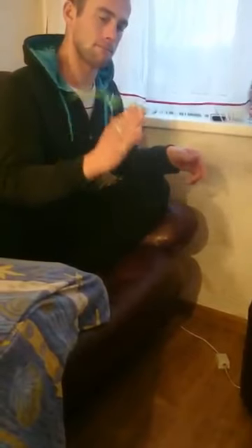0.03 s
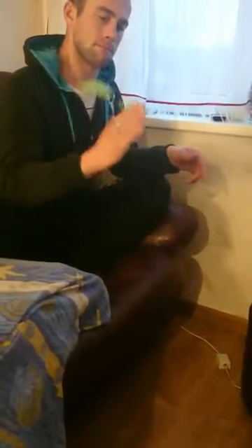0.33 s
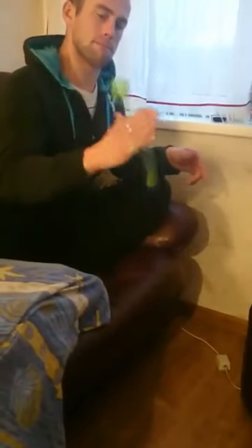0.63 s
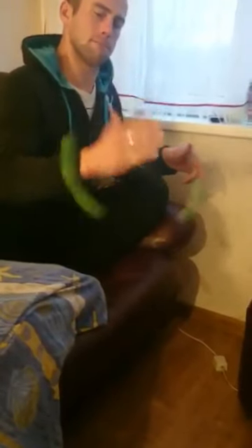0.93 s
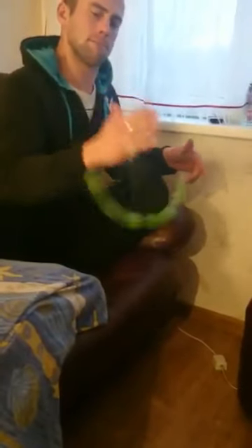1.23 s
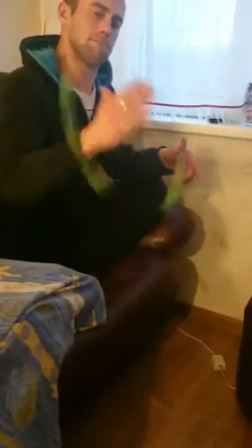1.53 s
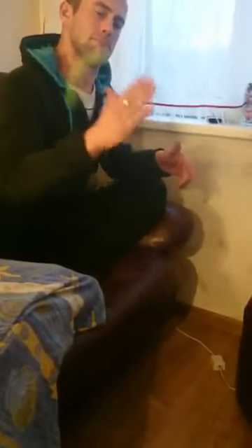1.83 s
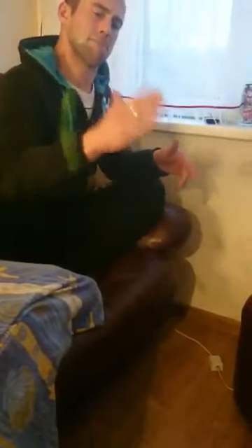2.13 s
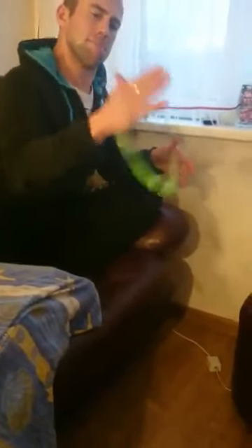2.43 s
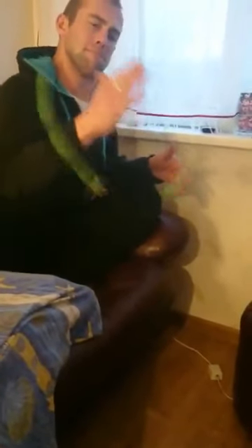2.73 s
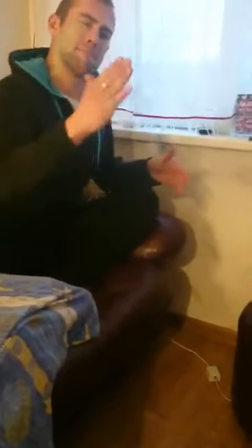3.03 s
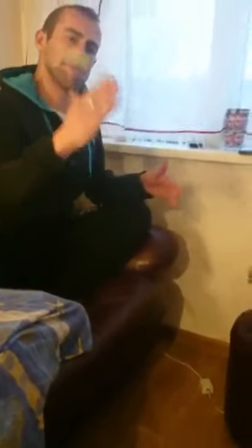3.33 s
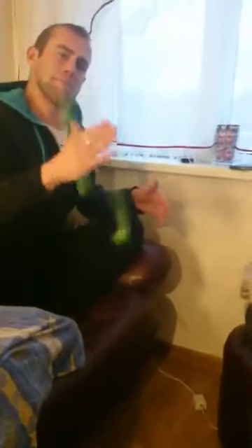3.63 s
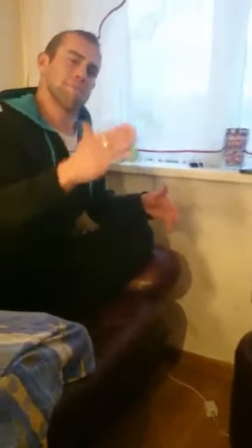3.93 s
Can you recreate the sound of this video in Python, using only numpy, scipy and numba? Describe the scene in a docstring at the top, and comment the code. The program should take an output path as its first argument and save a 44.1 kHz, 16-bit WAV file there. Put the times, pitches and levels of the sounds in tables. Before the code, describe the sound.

Clacker balls on a string strike each other from the start to the end at about 4 seconds, roughly fourteen times a second without a break. Each clack is a sharp tick with a short, bright small-room echo, at a nearly constant loud level. The hits overload the phone microphone, some adding a dull knock and rasp on the left. A faint low room rumble lies underneath.

```python
"""Clackers in a small room, on a phone's two microphones

Two hard balls on a string strike each other above and below the hand, about 14 times a second.
Each clack is a sharp tick followed by a bright wash of reflections, over a faint room rumble.
The clacks overload both microphones, the slightly nearer left one lopsidedly (a dull knock
and a rasp), and a fast limiter holds the level nearly flat."""
import sys
import numpy as np
from scipy import signal
from scipy.fft import rfft, irfft
from scipy.io import wavfile
from scipy.ndimage import uniform_filter1d, minimum_filter1d
from numba import njit

SR = 44100
rng = np.random.default_rng(int(sys.argv[2]) if len(sys.argv) > 2 else 0)


def store_pcm(level_fs):
    """Save levels as 16-bit WAV."""
    pcm = np.round(np.clip(level_fs, -1, 1) * 32767).astype(np.int16)
    wavfile.write(sys.argv[1], SR, np.atleast_2d(pcm).T)


N = 4 * SR
TOP_HZ = 15400  # upper edge of the phone's treble


def undb(db):
    """Decibels to gain."""
    return 10 ** (np.asarray(db) / 20)


def along(points, hz):
    """Reads (Hz, value) points on a log-frequency axis."""
    knots_hz, values = np.array(points).T
    return np.interp(np.log(hz + 1), np.log(knots_hz), values)


def unit(x):
    """Scales each channel to energy 1."""
    return x / np.sqrt(np.sum(x ** 2, axis=-1, keepdims=True))


def butter(x, hz, kind, order=2):
    """Plain low- or high-pass."""
    return signal.sosfilt(signal.butter(order, hz, kind, fs=SR, output="sos"), x)


def pulse(db_of_hz, size=512):
    """The shortest causal pulse with a given spectrum (minimum phase)."""
    hz = np.arange(size // 2 + 1) * SR / size
    cepstrum = irfft(np.log(undb(db_of_hz(hz))))
    cepstrum[1:size // 2] *= 2
    cepstrum[size // 2 + 1:] = 0
    return irfft(np.exp(rfft(cepstrum)))


# Spectrum of the balls' contact: frequency_hz, level_db
TICK_SPECTRUM = [(60, -34), (300, -11.5), (800, 4), (2000, 6), (4200, 3.5), (7000, -6), (12500, -0.5),
                 (15500, 4)]
# Paths to the phone (direct, off a near surface, off the farther wall): delay_s, level_db
TICK_PATHS = [(0, -18), (.004, -17), (0.0127, -19)]


def contact_tick(t, smear_s=0.00032):
    """The hard balls meet in a sharp tick, which arrives by three slightly smeared paths."""
    paths = np.zeros((2, len(t)))
    for delay_s, level_db in TICK_PATHS:
        age = t - delay_s * (1 + 0.1 * rng.standard_normal((2, 1)))  # the balls move between clacks
        arrival = rng.standard_normal(paths.shape) * (age >= 0) * np.exp(-np.abs(age) / smear_s)
        paths += undb(level_db) * unit(arrival)
    tick = unit(pulse(lambda hz: along(TICK_SPECTRUM, hz)))
    return signal.fftconvolve(paths, tick[None], axes=1)


# Time the small room takes to die away by 60 dB: frequency_hz, decay_s
ROOM_DECAY = [(200, 0.51), (1000, .3), (2500, 0.37), (4500, 0.38), (8000, 0.24), (13000, 0.16)]


def room_response(t, wash_rise_s=0.0014, early_per_s=500, early_fade_s=0.01, early_db=-6):
    """The room scatters sound to both microphones: sparse first reflections, then a dense wash."""
    shape = (2, len(t))
    hz = np.arange(len(t) // 2 + 1) * SR / len(t)
    centres_hz, decay_s = np.array(ROOM_DECAY).T
    band_shares = np.array([along(np.c_[centres_hz, row], hz) for row in np.eye(len(centres_hz))])
    bands = irfft(rfft(rng.standard_normal(shape)) * band_shares[:, None])
    fades = np.exp(-np.log(1000) * t / decay_s[:, None])
    wash = np.sum(bands * fades[:, None], axis=0) * (1 - np.exp(-t / wash_rise_s))
    early = rng.standard_normal(shape) * (rng.random(shape) < early_per_s / SR)
    early *= np.exp(-t / early_fade_s)
    return undb(early_db) * unit(early) + unit(wash)


# Spectrum of the clack that fills the room: frequency_hz, level_db
CLACK_SPECTRUM = [(60, -46), (300, -37.5), (700, -29), (1300, -20.5), (2000, -13.5), (2700, -9.5),
                  (3400, -3), (4200, 0), (5000, -1), (6300, -11), (8000, -20.5), (10000, -29), (12500, -15),
                  (15500, -34.5)]


def reflections(t, scatter_db=1.4):
    """A bright click sets the room ringing, its colour a little different each time."""
    scatter = np.c_[np.geomspace(1000, TOP_HZ, 10), scatter_db * rng.standard_normal(10)]
    click = unit(pulse(lambda hz: along(CLACK_SPECTRUM, hz) + along(scatter, hz)))
    return signal.fftconvolve(room_response(t), click[None], axes=1)[:, :len(t)]


# Collisions as they reach the phone: start_s, strength_db, left_extra_db
COLLISIONS = [(-0.06, -8.5, 0.0), (0.0205, -5.5, 4), (0.1012, -3.5, -1), (0.1828, -5.2, 3),
              (0.2613, -2.2, 4.9), (0.3357, -2, 1.7), (0.4031, -1, 11), (0.4754, -0.5, 3.7),
              (0.5421, 1.5, 2.5), (0.6108, -0.5, -1.6), (0.6799, 0, -0.3), (0.7502, -3.5, 5),
              (0.8216, -2, 13), (0.8959, -1.8, 4.7), (0.966, -2.5, 14.5), (1.0349, -3.1, 6.3),
              (1.0962, 4, -4), (1.1621, 1, -1.5), (1.2375, -1.3, 0.5), (1.3128, -3.2, 4), (1.3848, -1, 10),
              (1.4549, -0.0, 1), (1.5203, -2.7, 14), (1.5875, 2.5, 10.5), (1.649, 3, 8.5),
              (1.7136, -1.3, 6), (1.783, -2, 4.8), (1.855, -3, 2.7), (1.9247, 2.1, 2.7), (1.9905, 0.5, 2),
              (2.055, -1, 14), (2.1188, 1.5, 1.3), (2.183, -0.6, 9), (2.2491, 1.3, -0.1),
              (2.3122, 1.5, 1.5), (2.3799, -0.0, -1), (2.445, -1.3, 7.2), (2.5154, -0.3, -0.5),
              (2.5847, -1.1, 13.5), (2.6518, -0.7, 5.5), (2.7169, -1.5, 9), (2.7847, -3.3, 3.5),
              (2.852, -2.5, 2.5), (2.9209, 3.2, -2.5), (2.9893, -1.5, 0.5), (3.0579, -1.5, 2.3),
              (3.1292, 0.4, 10), (3.2011, -3.2, 4.5), (3.2721, -0.5, 12), (3.3418, 1.5, 2),
              (3.409, 2.9, 1.7), (3.4772, 0.8, -0.7), (3.5495, -3.7, 3.3), (3.6246, -3.5, 1.8),
              (3.699, -0.1, 6.5), (3.7659, -0.5, 1), (3.8341, -2, 14), (3.9038, -3.8, 10),
              (3.9779, 0.5, 12.5)]


def clackers(gain_db=29, left_nearer_db=1.5, left_extra_s=0.033):
    """Each collision gives a tick and reflections; the extra level at left fades with the early sound."""
    size = 16384  # samples in one clack
    t = np.arange(size) / SR
    track = np.zeros((2, N + 2 * size))
    for start_s, strength_db, left_extra_db in COLLISIONS:
        clack = reflections(t)
        tick = contact_tick(t[:2048])
        clack[:, :tick.shape[1]] += tick
        clack[0] *= undb(left_nearer_db + left_extra_db * np.exp(-(t / left_extra_s) ** 2))
        start = size + int(start_s * SR)
        track[:, start:start + size] += undb(gain_db + strength_db) * clack
    return track[:, size:size + N]


def room_rumble(level_db=-52.5, edge_hz=170):
    """Room tone: faint low noise, separate at each microphone."""
    noise = butter(rng.standard_normal((2, N)), edge_hz, "low")
    return undb(level_db) * np.sqrt(N) * unit(noise)


def scene():
    """The clackers over the quiet room, as the sound arrives at the phone."""
    return clackers() + room_rumble()


def overload(x, clip_db=5, unevenness=0.0078, fold_db=8, fold_depth=0.54, fold_ceiling_db=39):
    """Both microphones saturate; the left also rectifies big swings, adding a knock and an octave rasp."""
    squashed = np.tanh(x / undb(clip_db))
    clipped = undb(clip_db) * (squashed + unevenness * squashed ** 2)
    excess = np.maximum(np.abs(x[0]) - undb(fold_db), 0)
    ceiling = undb(fold_ceiling_db)
    clipped[0] -= fold_depth * ceiling * np.tanh(excess / ceiling)
    return butter(clipped, hz=60, kind="high", order=1)


# Response of the phone's microphones after their overload: frequency_hz, left_db, right_db
MIC_RESPONSE = [(30.5, -1.5, 2), (91, 4.5, 0), (156, 0.5, -10.5), (218, -2, -2.5), (326, 3.5, -4),
                (890, 2.5, -1), (2000, 2, -1), (4200, 2, -2), (6500, 2.5, -3), (9500, 4.5, 4.5),
                (12000, 1.5, 1.5), (14800, -0.5, -6)]


def microphone_tone(x):
    """Each microphone colours the sound in its own way."""
    knots_hz, left_db, right_db = np.array(MIC_RESPONSE).T
    coloured = []
    for channel, db in zip(x, (left_db, right_db)):
        response = pulse(lambda hz: along(np.c_[knots_hz, db], hz), size=4096)
        coloured.append(signal.fftconvolve(channel, response)[:N])
    return coloured


@njit
def follow_peaks(x, release):
    """Peak follower: up at once, slowly down."""
    envelope, peak = np.empty(len(x)), 0.
    for i in range(len(x)):
        peak = max(x[i], peak * release)
        envelope[i] = peak
    return envelope


def limiter(x, threshold_db=-10.5, ratio=6.83, detect_s=0.0019, look_ahead_s=0.0048, release_s=0.014):
    """Sees each clack coming, ramps the gain down before it and recovers quickly."""
    power = uniform_filter1d(x ** 2, int(detect_s * SR))
    level = follow_peaks(np.sqrt(np.abs(power)), np.exp(-1 / (release_s * SR)))
    gain = np.maximum(level / undb(threshold_db), 1) ** (1 / ratio - 1)
    half = int(look_ahead_s * SR / 2)
    held = minimum_filter1d(gain, 2 * half + 1, origin=-half)
    return x * uniform_filter1d(held, 2 * half + 1, origin=half)


def record(dry, makeup_db=2, ceiling=0.92):
    """The phone: two overloaded microphones, a limiter for each, rounded peaks and a steep treble cut."""
    channels = microphone_tone(overload(dry))
    limited = undb(makeup_db) * np.array([limiter(channel) for channel in channels])
    rounded = limited / (1 + np.abs(limited / ceiling) ** 8) ** (1 / 8)
    treble_cut = signal.ellip(8, 0.2, 70, TOP_HZ, fs=SR, output="sos")
    return signal.sosfilt(treble_cut, rounded)


dry = scene()
out = record(dry)
store_pcm(out)
```